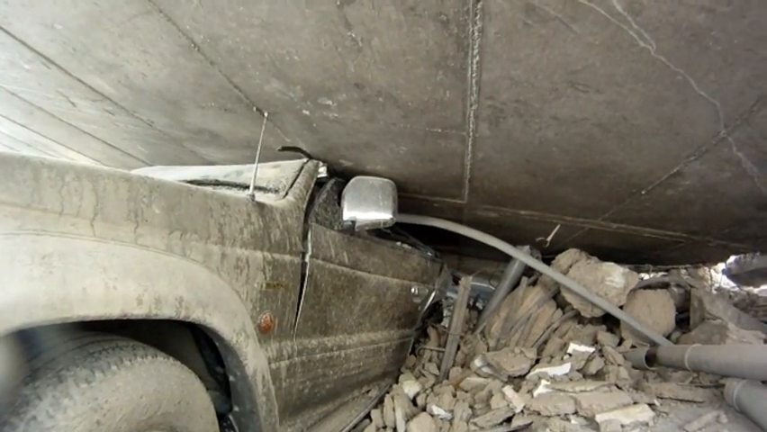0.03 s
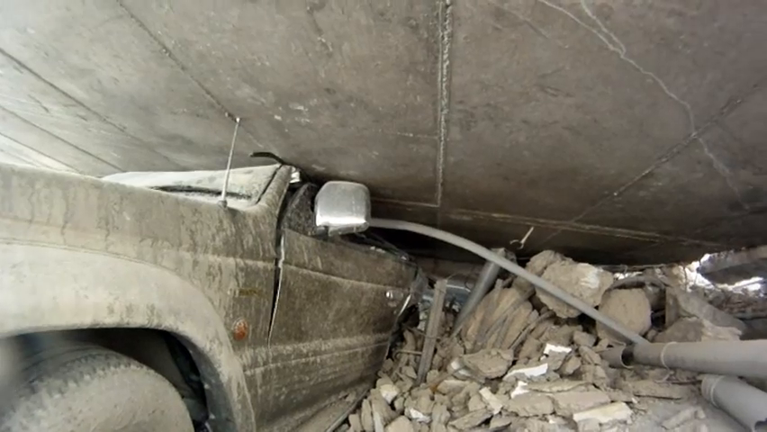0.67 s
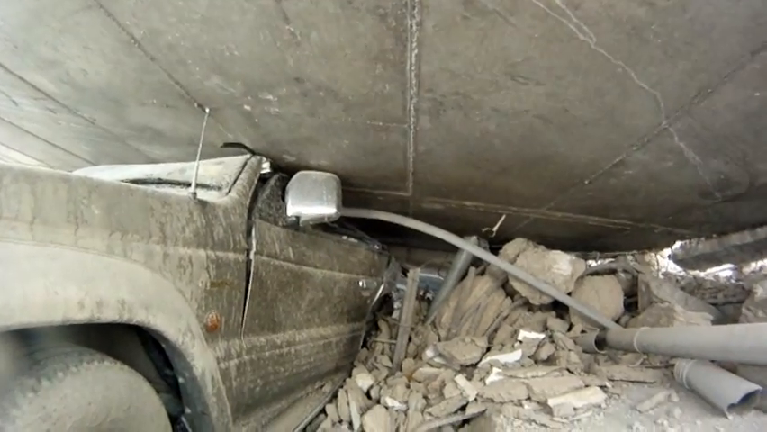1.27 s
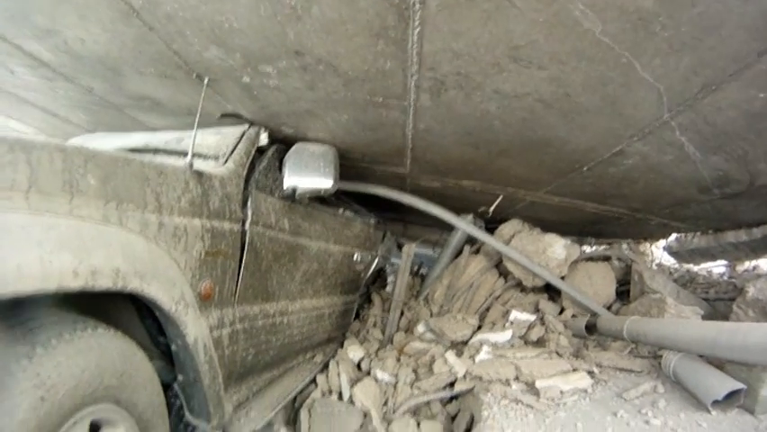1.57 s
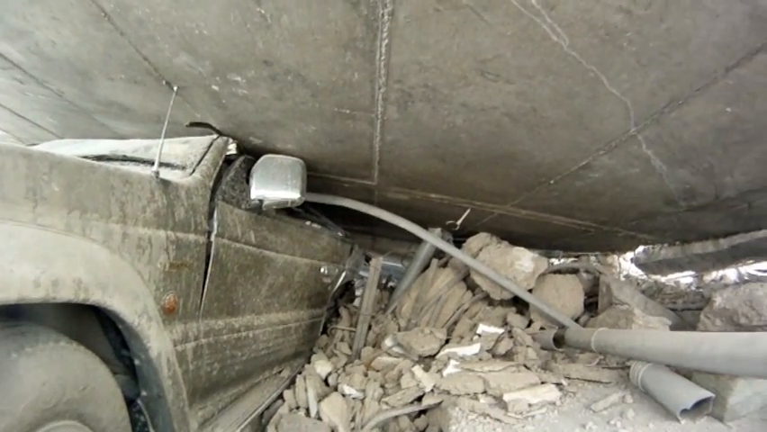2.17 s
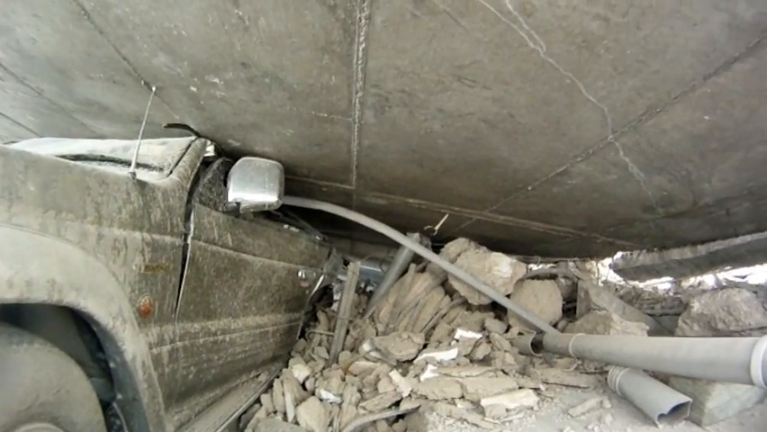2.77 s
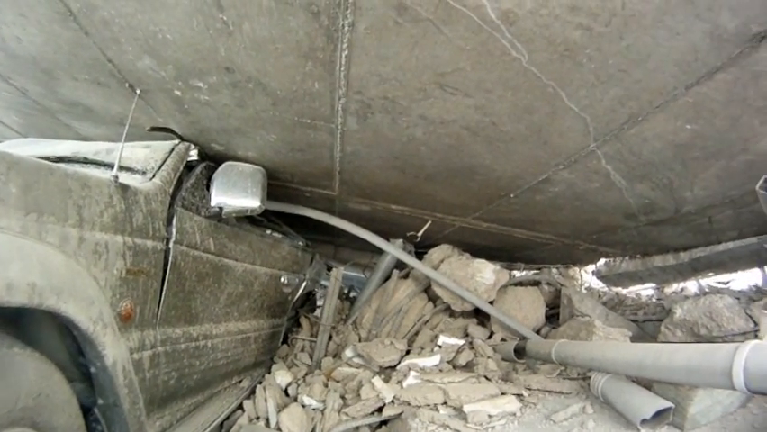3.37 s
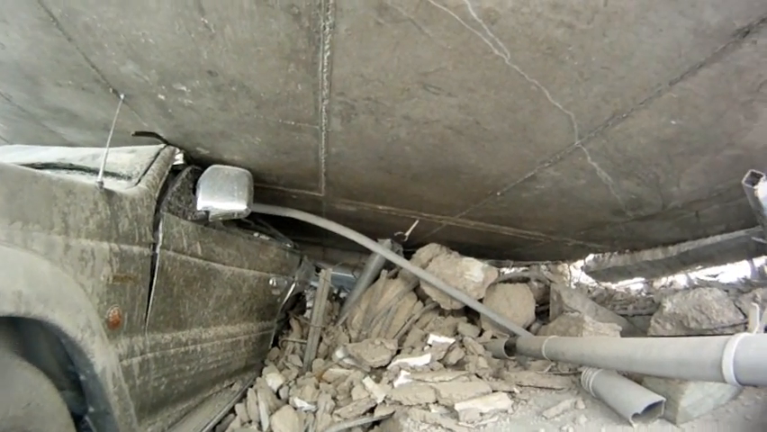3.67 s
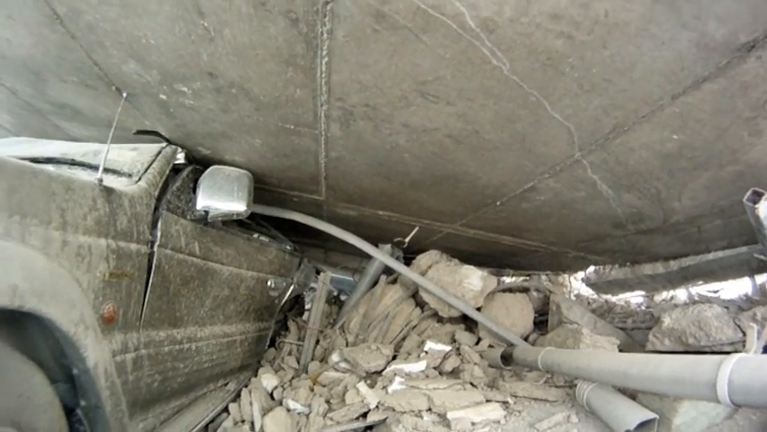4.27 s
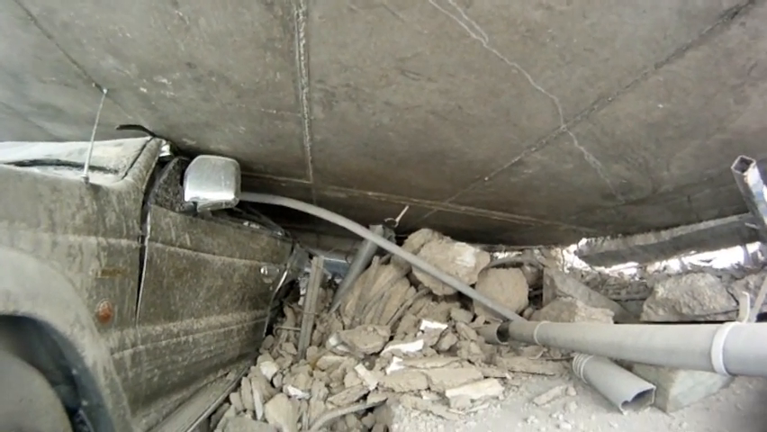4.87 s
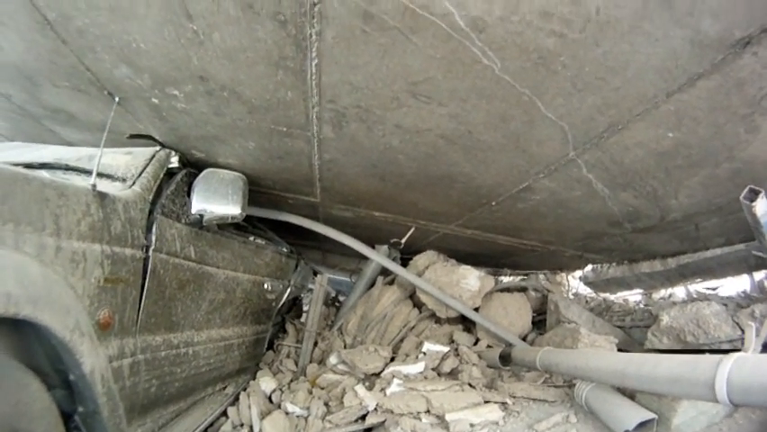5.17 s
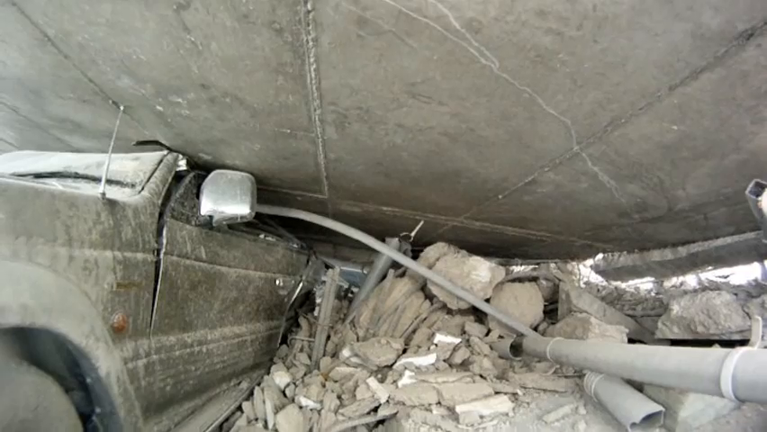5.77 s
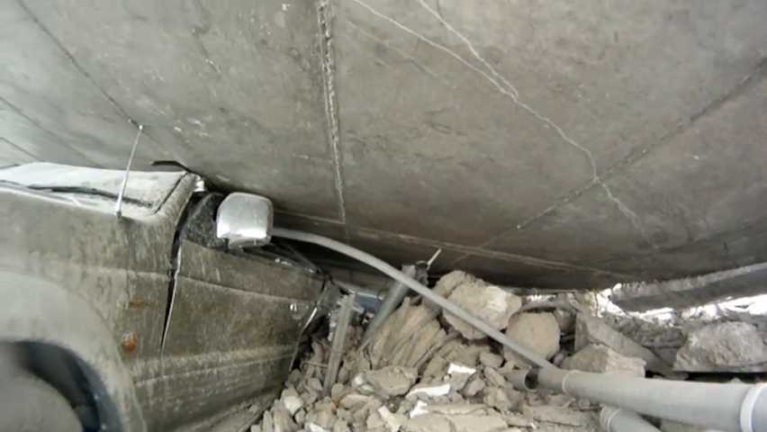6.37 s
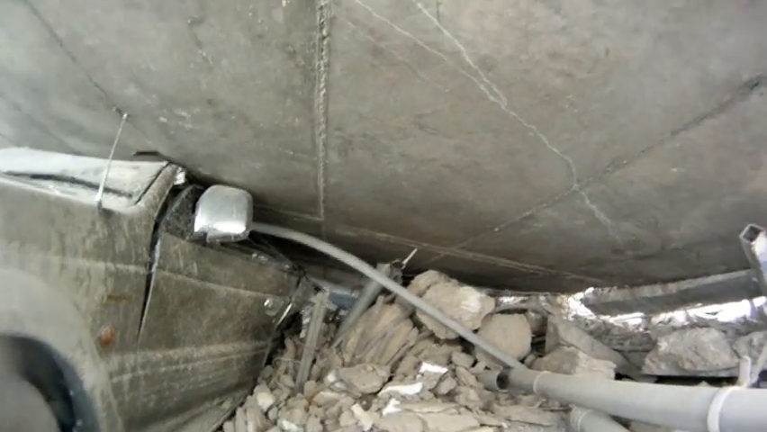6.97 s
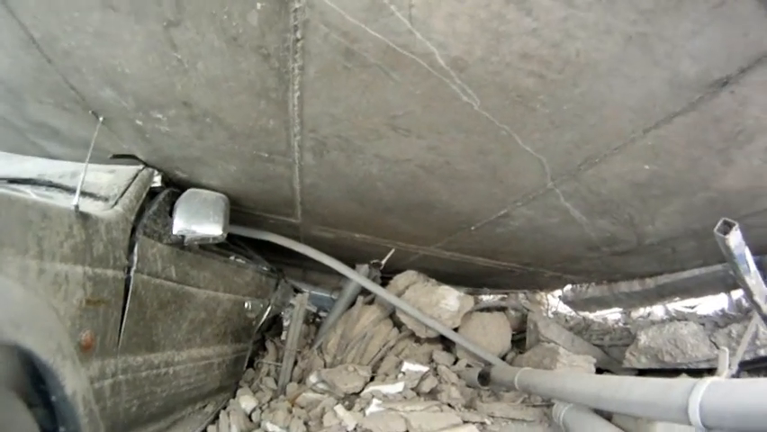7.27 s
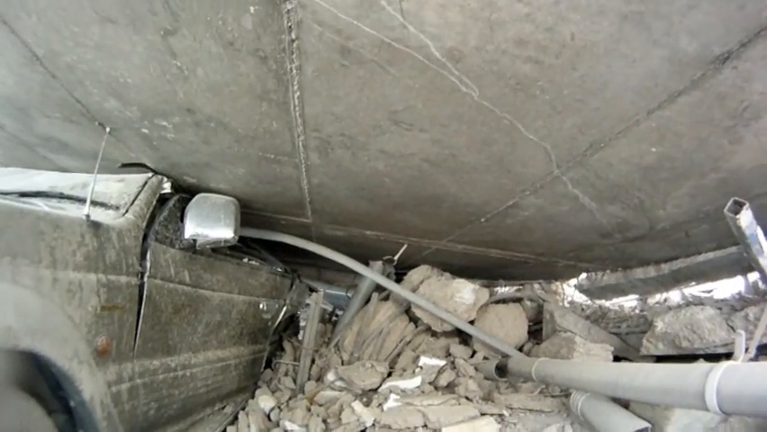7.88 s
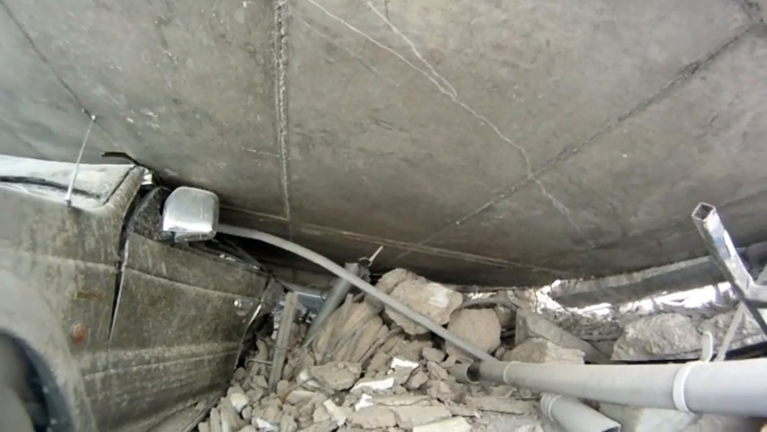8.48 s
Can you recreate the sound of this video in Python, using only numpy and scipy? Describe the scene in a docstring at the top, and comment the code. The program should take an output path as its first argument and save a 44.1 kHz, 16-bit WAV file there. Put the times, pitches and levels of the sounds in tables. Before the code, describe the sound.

A small camera is handled outdoors in a quiet hush, heard through its own microphone. Fingers scrape and slip on the plastic case over a low hand rumble, leading to a hard click. A lull with a faint distant hum ends in a bump. Rubs, brief squeals, clicks and bumps then build to a dense flurry and fall back to the hush. The treble is gritty and lo-fi.

```python
"""A small camera is handled beside a wrecked car under a fallen concrete slab, in a quiet outdoor hush.
The hand rumbles; fingers stick and slip on the plastic case, ringing it, up to a hard click at 1.7 s.
A lull with a faint hum ends in a bump at 4.3 s. Rubs, squeals, clicks and bumps then build, thickest
from 6.2 to 7.4 s, and fall back to the hush and two distant hums. Throughout, the camera holds each
of its coarse samples, which mirrors every sound into a gritty treble."""
import sys
import numpy as np
from scipy import signal
from scipy.fft import rfft, irfft
from scipy.io import wavfile

SR = 44100
rng = np.random.default_rng(int(sys.argv[2]) if len(sys.argv) > 2 else 0)


def inscribe(sig):
    """Save sig as 16-bit PCM at rate SR to the path in sys.argv[1].

    A 1-D sig is mono; a 2-D sig holds one channel per row.
    Samples are clipped to [-1, 1] before scaling.
    """
    pcm = np.round(np.clip(np.atleast_2d(sig).T, -1, 1) * 32767)
    wavfile.write(sys.argv[1], SR, pcm.astype(np.int16))


N = 375732
TIME = np.arange(N) / SR


def from_db(db):
    """Decibels to gain."""
    return 10 ** (np.asarray(db) / 20)


def rms_one(x):
    """Scale to an rms of one."""
    return x / np.sqrt(np.mean(x ** 2) + 1e-20)


def automation(points):
    """Join (time, value) breakpoints into one value per sample."""
    return np.interp(TIME, *np.transpose(points))


def butter(x, hz, kind, order=2):
    """Causal Butterworth filter."""
    return signal.sosfilt(signal.butter(order, hz, kind, fs=SR, output="sos"), x + 1e-18)


def drift(rate_hz):
    """Slow random modulation with an rms of one."""
    return rms_one(butter(rng.standard_normal(N + SR), rate_hz, "low")[SR:])


def resonate(x, modes):
    """A bank of parallel resonators of alternating polarity, scaled to an rms of one."""
    out = 0
    for k, (hz, width_hz, db) in enumerate(modes):
        r = np.exp(-np.pi * width_hz / SR)
        poles = [1, -2 * r * np.cos(2 * np.pi * hz / SR), r * r]
        out = out + (-1) ** k * from_db(db) * (1 - r * r) / 2 * signal.lfilter([1, 0, -1], poles, x)
    return rms_one(out)


def gliding_resonance(x, hz, width_hz):
    """One resonance whose centre follows a pitch curve."""
    carrier = np.exp(2j * np.pi * np.cumsum(hz) / SR)
    baseband = signal.lfilter([1], [1, -np.exp(-np.pi * width_hz / SR)], x / carrier)
    return rms_one((baseband * carrier).real)


def ring(t, hz, t60):
    """A sine that dies by 60 dB in t60 seconds."""
    return np.sin(2 * np.pi * hz * t) * np.exp(-np.log(1000) * t / t60)


def add(track, start, sound):
    """Mix a short sound into a track, start seconds in."""
    at = max(round(start * SR), 0)
    track[at:at + len(sound)] += sound[:N - at]


# EQ curve of the outdoor bed: f/Hz, relative level/dB
HUSH_EQ = [(59, -48), (100, -2.5), (250, -8), (406, -11.5), (558, -17.5), (1200, -16.5), (1330, -7),
           (1440, -31.5), (2090, -14.5), (5400, -26), (7020, -22), (11900, -120)]


def outdoor_hush(level_db=-64.5):
    """The bed: steady, dark noise of the open air."""
    hz, db = np.transpose(HUSH_EQ)
    bins_hz = np.maximum(np.fft.rfftfreq(N, 1 / SR), 1)
    colour = from_db(np.interp(np.log(bins_hz), np.log(hz), db))
    return from_db(level_db) * rms_one(irfft(rfft(rng.standard_normal(N)) * colour, N))


# far-off tones: start t/s, end t/s, f/Hz, level/dB
HUM_CUES = [(2.197, 4.614, 585, -75.5), (7.5, 8.6, 402, -75), (7.5, 8.6, 201, -74.5)]


def distant_hums(fade_s=0.15, waver=0.0041):
    """Faint hums fade in and out, slightly unsteady in pitch."""
    out = np.zeros(N)
    for start, end, hz, level_db in HUM_CUES:
        fade = np.clip(np.minimum(TIME - start, end - TIME) / fade_s, 0, 1)
        phase = 2 * np.pi * np.cumsum(hz * (1 + waver * drift(2.44))) / SR
        out += from_db(level_db) * fade * np.sqrt(2) * np.sin(phase)
    return out


def stroke_envelope(length, hardest, grab_s, let_go_s, swell_db=7.5, ease_db=10):
    """A stroke takes hold, swells to its hardest push, eases and lets go."""
    t = TIME[:round((length + (grab_s + let_go_s) / 2) * SR)] - grab_s / 2
    push_db = np.interp(t, [0, length * np.clip(hardest, .02, .98), length], [-swell_db, 0, -ease_db])
    return from_db(push_db) * np.clip(.5 + np.minimum(t / grab_s, (length - t) / let_go_s), 0, 1)


def hand_rumble(tremor_db=-54, creep_share=0.5, stroke_trim_db=4.0, settle_s=0.07, lumpy_db=2.0):
    """Lumpy low end: the hand's tremor reaches the microphone, riding the creep and strokes below."""
    creep_db = automation(GRIP_CREEP)
    power = from_db(tremor_db + creep_share * (creep_db - creep_db.mean())) ** 2
    for start, length, hardest, *_, rumble_db in FINGER_STROKES:
        envelope = stroke_envelope(length, hardest, grab_s=settle_s, let_go_s=settle_s)
        shake = from_db(rumble_db + stroke_trim_db) * envelope
        add(power, start - settle_s / 2, shake ** 2)
    dark_noise = butter(rng.standard_normal(N), 40, "low", order=1)
    rumble = butter(dark_noise, [18, 110], "band")
    lumps = from_db(lumpy_db * drift(14))
    return np.sqrt(power) * rms_one(rumble * lumps)


# soft hits of the hand on the case: t/s, peak level before the rattle/dB, contact time/s
BUMP_CUES = [(1.729, -6.5, 0.00064), (4.3302, -10, 0.00086), (5.5911, -18.5, 0.00073), (5.81, -26, 0.0016),
             (6.07, -24.5, 0.002), (6.568, -15, 0.00032), (6.593, -24, 0.0029), (7.04, -42, 0.011),
             (7.302, -17, 0.00031), (7.414, -32, 0.0016)]


def hand_bumps(knock_db=1.5, sway_db=-11.0, rattle_db=-18.5, rattle_t60=0.059):
    """A soft push on the case: a damped thud and knock, a slow sway, a faint rattle of loose parts."""
    out, t = np.zeros(N), TIME[:SR // 5]
    thud_hz, knock_hz, sway_hz = 100, 330, 28
    thud = ring(t, thud_hz, t60=0.02) / thud_hz
    knock = from_db(knock_db) * ring(t, knock_hz, t60=0.0035) / knock_hz
    sway = from_db(sway_db) * ring(t, sway_hz, t60=0.072) / sway_hz
    velocity = np.gradient(thud + knock + sway)
    for start, peak_db, contact_s in BUMP_CUES:
        push = np.sin(np.pi * np.minimum(t / contact_s, 1))
        bump = signal.fftconvolve(push, velocity)[:len(t)]
        rattle = resonate(rng.standard_normal(len(t)), SHELL_MODES + EDGE_MODES)
        rattle *= from_db(rattle_db - 60 * t / rattle_t60)
        rattle *= 1 - np.exp(-t / contact_s)  # builds while the hand is pushing
        add(out, start, from_db(peak_db) * (bump / np.abs(bump).max() + rattle))
    return out


# brief squeals and hollow notes: start t/s, end t/s, f/Hz, level/dB
SQUEAL_CUES = [(0.277, 0.375, 1320, -67), (1.003, 1.24, 2720, -58), (1.25, 1.42, 866, -43.5),
               (1.341, 1.426, 536, -45), (1.619, 1.678, 3800, -33.5), (2.926, 3.092, 3960, -66),
               (4.468, 4.8, 1270, -61.5), (4.842, 4.892, 2380, -45), (5.26, 5.33, 4000, -68),
               (5.432, 5.46, 2420, -46.5), (5.584, 5.616, 1017, -36), (5.918, 5.953, 2580, -42),
               (6.22, 6.317, 860, -35.5), (6.588, 6.778, 3784, -37), (6.868, 6.985, 3773, -28.5),
               (6.876, 6.997, 522, -39), (6.922, 6.957, 2944, -24), (7.161, 7.306, 3610, -28.5),
               (7.198, 7.318, 900, -34.5), (7.215, 7.287, 2470, -22.5), (8.34, 8.48, 1310, -62)]


def finger_squeals(width_hz=65, waver=0.011, fade_share=0.28):
    """Friction feeds one narrow resonance, whose pitch wavers slightly at random."""
    out = np.zeros(N)
    bend = 1 + waver * drift(9.1)
    for start, end, hz, level_db in SQUEAL_CUES:
        centre_hz = hz * bend[round(start * SR):round(end * SR)]
        tone = gliding_resonance(rng.standard_normal(len(centre_hz)), centre_hz, width_hz)
        tone = rms_one(butter(tone, [hz / 1.08, hz * 1.13], "band"))
        add(out, start, from_db(level_db) * tone * signal.windows.tukey(len(tone), 2 * fade_share))
    return out


# body of the struck case: f/Hz, relative level/dB, t60/s
STRUCK_MODES = [(536, -14, 0.025), (930, -15.5, 0.042), (1170, -0.5, 0.014), (1478, 1, 0.018),
                (1910, 1.5, 0.021), (2064, -2, 0.023), (2510, -3.5, 0.024)]
# hard snaps: t/s, peak level/dB, centre f/Hz, edge level/dB re body, hollow level/dB re body
CLICK_CUES = [(0.681, -32, 2600, 4, -27), (1.259, -15.5, 1880, -18, -8), (1.366, -12, 2170, -17, -13),
              (1.729, -6.5, 1950, -22, 2.5), (2.027, -21.5, 2150, -10, -23), (2.472, -40.5, 2070, -9, -6),
              (2.621, -36.5, 1920, -4, -26), (2.803, -37, 2070, -5, -17), (3.097, -34.5, 1900, -6, -28),
              (3.12, -27, 2070, -6, -22), (4.33, -20.5, 590, -4, -19), (4.943, -10, 2600, -13, -27),
              (5.543, -35.5, 807, -3, -13), (5.596, -19, 1560, -28, -13), (6.068, -15.5, 2020, -12, -2),
              (6.287, -1, 2040, -19, -6), (6.383, -13, 2140, -19, -10), (6.73, -4, 1710, -25, -7.5),
              (6.772, -12, 2190, -10, -18), (6.785, -15.5, 2180, 0, -24), (6.831, -16, 786, -20, 0),
              (7.038, -22, 3620, 10, -11), (7.326, -19, 1850, -29, -14), (7.341, -23, 1940, -16, -18),
              (7.356, -24, 2120, -22, -2), (7.416, -22, 1890, -16, -26), (7.432, -22, 2110, -8, -0.5)]


def case_clicks(focus_db_per_octave=18.5, scatter_db=2.0, chatter_s=0.0014, chatter_db=-3.5):
    """Plastic parts snap together, ring the case and chatter for a few milliseconds."""
    out, t = np.zeros(N), TIME[:SR // 20]
    hz, mode_db, t60 = np.transpose(STRUCK_MODES)[:, :, None]
    for start, peak_db, centre_hz, edge_db, hollow_db in CLICK_CUES:
        # the point of contact favours the modes near one pitch
        off_centre_db = focus_db_per_octave * np.abs(np.log2(hz / centre_hz))
        gains = from_db(mode_db - off_centre_db + rng.normal(0, scatter_db, hz.shape))
        body = np.sum(gains * ring(t, hz, t60), axis=0) / np.linalg.norm(gains)
        edge = from_db(edge_db) * ring(t, hz=3460, t60=0.016)
        hollow = from_db(hollow_db) * ring(t, hz=860, t60=0.013)
        snap = body + edge + hollow
        chatter = rng.standard_normal(len(t)) * (t / chatter_s) * np.exp(-t / chatter_s)
        chatter = from_db(chatter_db) * chatter / np.linalg.norm(chatter)
        click = butter(snap + signal.fftconvolve(chatter, snap)[:len(t)], 300, "high")
        add(out, start, from_db(peak_db) * click / np.abs(click).max())
    return out


# level ride of the holding hand creeping on the case: t/s, level/dB
GRIP_CREEP = [(0, -62.5), (.5, -66.5), (.85, -56.5), (1.2, -49.5), (1.45, -53), (1.85, -56), (2.15, -53),
              (2.4, -63.5), (2.75, -61.5), (2.95, -54.5), (3.6, -62), (4.45, -61), (4.75, -49), (5.3, -58),
              (5.7, -55.5), (7.35, -51), (7.55, -64.5), (8.52, -65)]
# finger slides: start t/s, length/s, place of the hardest push/0-1, shell level/dB,
# hollow send/dB re shell, edge send/dB re shell, rumble level before its trim/dB
FINGER_STROKES = [(.02, .04, 0.5, -64, -12, 7, -62), (0.569, 0.092, 0.65, -51.5, -12, -13, -49),
                  (0.668, 0.058, 0.28, -39.5, -10.5, -10, -54), (0.72, 0.038, 0.58, -40.5, -12, -16, -38.5),
                  (1.248, 0.058, 0.59, -27.5, -7.5, -10, -33), (1.319, .087, 0.88, -27.5, -10, -13, -50),
                  (1.51, 0.083, 0.32, -37.5, -15, -6, -54), (1.579, 0.18, .45, -25.5, -17.5, -8.5, -51),
                  (1.778, 0.049, 0, -42.5, -9, -2, -43), (1.887, 0.073, 0.29, -32, -10.5, -7.5, -42),
                  (1.986, 0.057, 0.85, -38.5, -5.5, -6, -44), (2.041, .18, 0.06, -45, -12, -10, -52),
                  (2.796, 0.09, 0.18, -44.5, -17, -17, -56), (2.901, 0.052, 1, -45, -15, -10.5, -44),
                  (2.964, 0.025, 0.8, -47, -8, -16, -44), (3.084, 0.14, 0.07, -57, -6, -10, -44),
                  (4.119, 0.2, 0.38, -47.5, -8.5, -11, -46.5), (4.794, 0.048, 0.25, -43.5, -12, -10, -62),
                  (4.843, 0.067, 0.3, -40.5, -9, -10, -60), (4.9, 0.23, 0.57, -46, -10.5, -9, -59),
                  (5.051, 0.051, 0.61, -41.5, -6.5, -6.5, -42),
                  (5.191, 0.064, 0.81, -41.5, -3, -8.5, -44.5), (5.351, 0.071, 0.26, -48.5, -6, -15, -47.5),
                  (5.431, 0.097, 0.17, -43.5, -10, -15, -52), (5.534, 0.11, 0.17, -48.5, -1.5, -7.5, -49),
                  (5.587, 0.099, 0.2, -39.5, 2, -13, -51), (5.683, 0.12, 0.57, -57.5, 4, -13, -50.5),
                  (5.808, 0.12, 0.46, -45, -2, -10.5, -48), (5.919, 0.094, 0, -42, -9, -10, -51),
                  (6.04, 0.096, 0.6, -39, -4.5, -11, -37), (6.13, 0.031, 0.8, -31.5, -18, -10, -37),
                  (6.179, 0.072, 0.9, -32, -17, -8.5, -51), (6.212, .12, 0.15, -24.5, -10.5, -14.5, -39),
                  (6.35, 0.017, 0.65, -30, -7.5, -15, -33), (6.37, 0.11, 0.06, -30, -8.5, -11.5, -40),
                  (6.479, 0.076, .6, -39, -10, -29, -36), (6.523, 0.22, 0.35, -28.5, -11.5, -9.5, -41),
                  (6.74, 0.037, .5, -32.5, 2, -2, -38), (6.757, 0.072, 0.3, -19, -16.5, -9.5, -44),
                  (6.825, 0.048, 0.32, -32, -6.5, -5.5, -53), (6.882, 0.097, 0.46, -22.5, -10, -7.5, -41),
                  (7.039, 0.048, 0.05, -43, -7, -8, -44), (7.096, 0.053, 0.42, -34, -5, -10, -43),
                  (7.144, 0.054, 0.5, -33.5, -0.5, -6, -47), (7.187, 0.037, .4, -24, -10, -10, -35),
                  (7.214, 0.092, 0.33, -21, -10.5, -12, -42), (7.324, 0.11, 0.4, -36.5, -10.5, -14, -55),
                  (7.407, .038, 0.38, -30, -17, -15, -44), (7.814, 0.054, 0.7, -51, -5, -15, -48)]


def finger_faders(creep_hollow_db=-9.5, creep_edge_db=-12.5, grab_s=0.01, let_go_s=0.013):
    """Gains of the shell, hollow and edge layers: the strokes add in power to the hand's creep."""
    creep_db = automation(GRIP_CREEP)
    powers = [from_db(creep_db + send_db) ** 2 for send_db in (0, creep_hollow_db, creep_edge_db)]
    for start, length, hardest, level_db, hollow_db, edge_db, _ in FINGER_STROKES:
        stroke = from_db(level_db) * stroke_envelope(length, hardest, grab_s, let_go_s)
        for power, send_db in zip(powers, (0, hollow_db, edge_db)):
            add(power, start - grab_s / 2, (from_db(send_db) * stroke) ** 2)
    return np.sqrt(powers)


def skin_slips(press, slips_per_s=1400, size_db=3.0, catches_per_s=80, catch_db=3.5, catch_s=0.013):
    """Skin sticks and slips in tiny uneven jerks; a light touch only hisses."""
    sizes = from_db(size_db * np.minimum(rng.exponential(1, N), 3)) * rng.choice([-1, 1], N)
    # the skin catches and lets go in flurries that start hard and die away
    catches = (rng.random(N) < catches_per_s / SR) * rng.uniform(0, 1.73, N)
    flurry = np.minimum(signal.lfilter([1], [1, -np.exp(-1 / (catch_s * SR))], catches + 1e-18), 2)
    jerks = rms_one(sizes * (rng.random(N) < slips_per_s / SR) * from_db(catch_db * flurry))
    hiss_gain = from_db(-1.5)
    hiss = hiss_gain * rng.standard_normal(N)
    return (press * jerks + hiss) / np.sqrt(press ** 2 + hiss_gain ** 2)


def grip_comb(x, lag_s=0.001776, wander=0.17, echo_db=-5.0):
    """A short echo inside the grip combs the sound; its delay wanders as the hand shifts."""
    delay_s = lag_s * np.exp(wander * np.tanh(drift(1.83)))
    return rms_one(x + from_db(echo_db) * np.interp(TIME - delay_s, TIME, x))


# the rubbed case, as boxy lows, plastic mids and a thin top: f/Hz, width/Hz, relative level/dB
HOLLOW_MODES = [(166, 95, 0), (296, 127, -0.5), (568, 79, -2.5), (806, 73, -2), (1102, 168, -3)]
SHELL_MODES = [(1140, 725, 0), (1672, 420, 6), (2178, 149, 7), (2655, 120, 7.5), (2830, 256, 4)]
EDGE_MODES = [(3620, 110, 8.5), (3844, 180, 4), (4810, 980, -7)]


def finger_rubbing(main_hz=2157, wander_hz=61.3, lightest_db=-79, firm_db=-41, press_range_db=25):
    """The slips ring the case; the grip shifts its main resonance, and a light touch sounds boomier."""
    shell_gain, hollow_gain, edge_gain = finger_faders()
    push_db = 20 * np.log10(shell_gain)
    press = np.clip((push_db - lightest_db) / press_range_db, 0, 1.2)
    friction = grip_comb(skin_slips(press))
    main_ring = gliding_resonance(friction, main_hz + wander_hz * drift(7.5), width_hz=150)
    shell = resonate(friction, SHELL_MODES) + from_db(-6) * main_ring
    shell = rms_one(butter(shell, [1000, 3300], "band"))
    boom_db = -3.5 - 0.31 * (push_db - firm_db)  # the deepest modes fall behind as the push grows
    boom = from_db(boom_db) * resonate(friction, HOLLOW_MODES[:2])
    hollow = from_db(-1) * butter(boom + resonate(friction, HOLLOW_MODES[2:]), 2150, "low")
    edge = from_db(0.5) * rms_one(butter(resonate(friction, EDGE_MODES), 5040, "high"))
    return shell_gain * shell + hollow_gain * hollow + edge_gain * edge


def scene():
    """Mono mix at the built-in microphone: close handling over the outdoor bed."""
    handling = finger_rubbing() + finger_squeals() + case_clicks() + hand_bumps() + hand_rumble()
    return (handling + outdoor_hush() + distant_hums())[None]


def record(dry, overload=0.48, anti_alias_hz=5600, hold_hz=12000, cutoff_hz=15500):
    """Lo-fi grit: peaks clip, sample-and-hold mirrors the sound around the hold rate, the top is cut."""
    narrow = butter(np.clip(dry, -overload, overload), anti_alias_hz, "low", order=16)
    mirrored = narrow * (1 + 2 * np.cos(2 * np.pi * hold_hz * TIME))
    hold_droop = np.sinc(np.fft.rfftfreq(N, 1 / SR) / hold_hz)
    held = irfft(rfft(mirrored) * hold_droop, N)
    return signal.sosfilt(signal.ellip(10, .2, 80, cutoff_hz, fs=SR, output="sos"), held)


dry = scene()
out = record(dry)
inscribe(out)
```